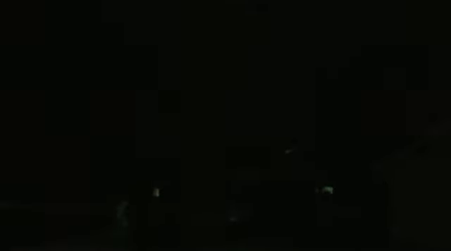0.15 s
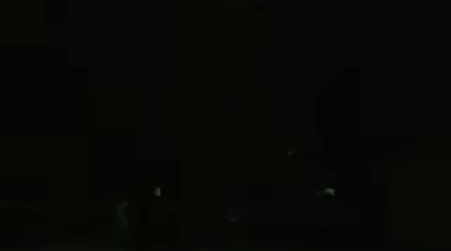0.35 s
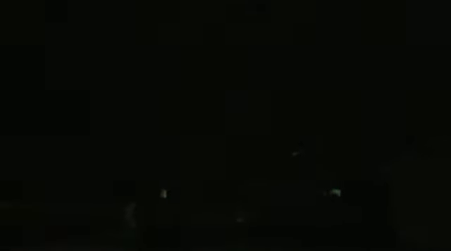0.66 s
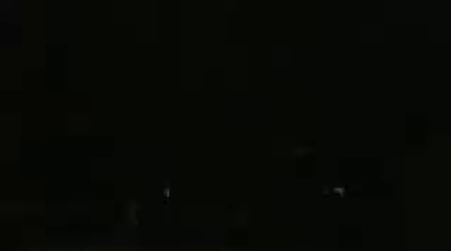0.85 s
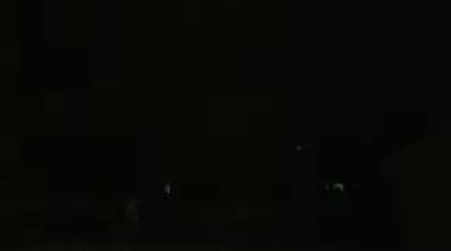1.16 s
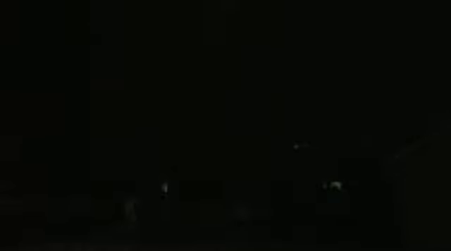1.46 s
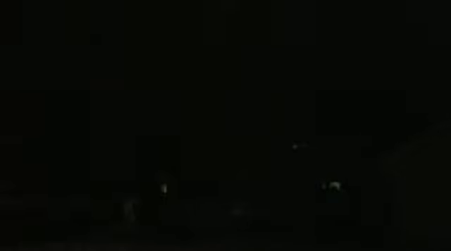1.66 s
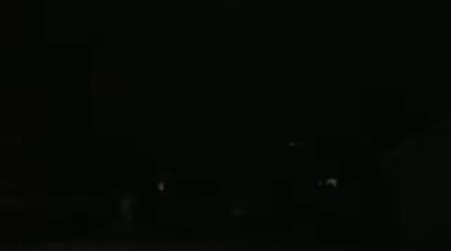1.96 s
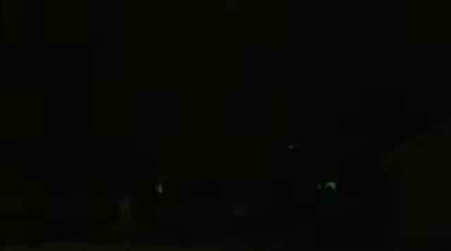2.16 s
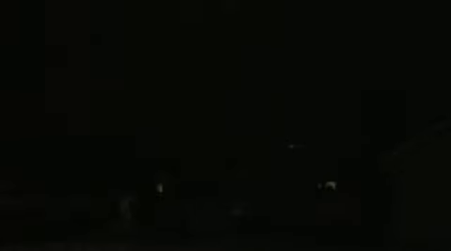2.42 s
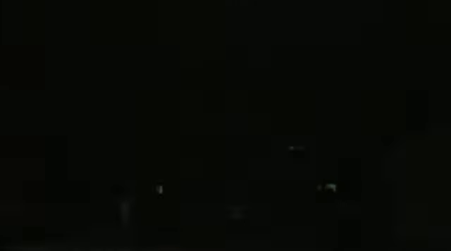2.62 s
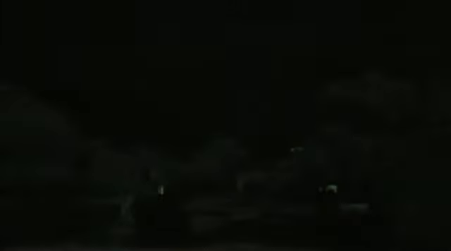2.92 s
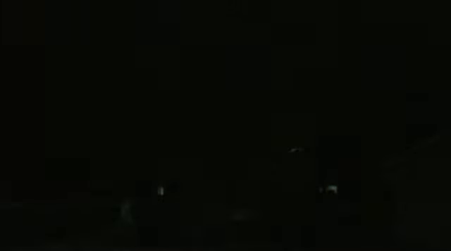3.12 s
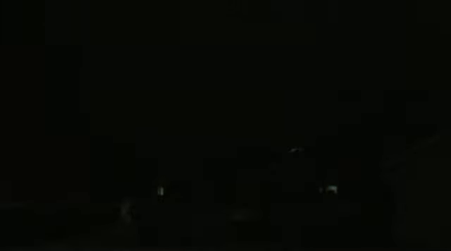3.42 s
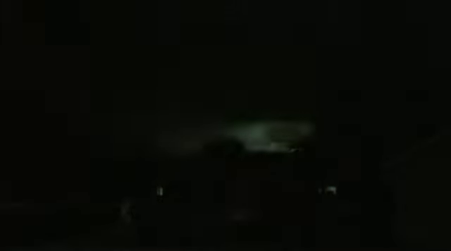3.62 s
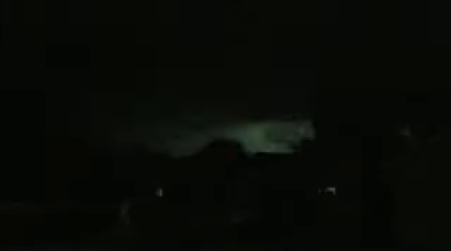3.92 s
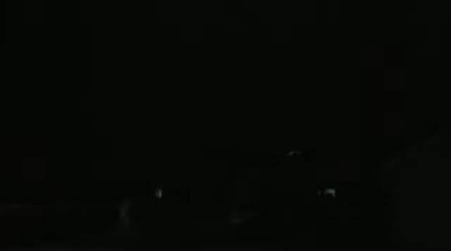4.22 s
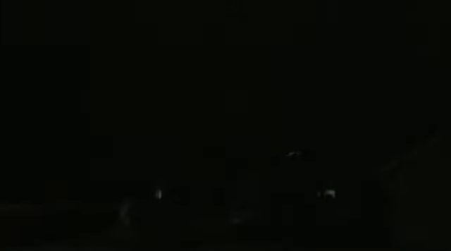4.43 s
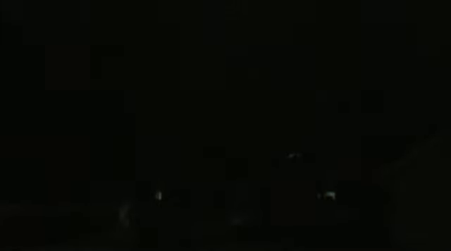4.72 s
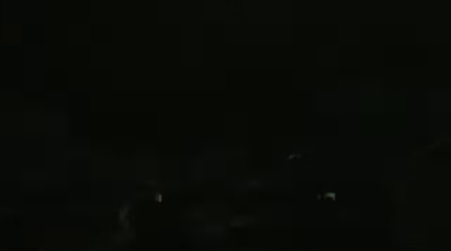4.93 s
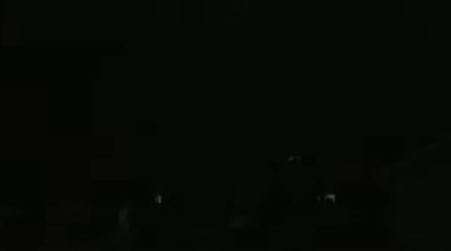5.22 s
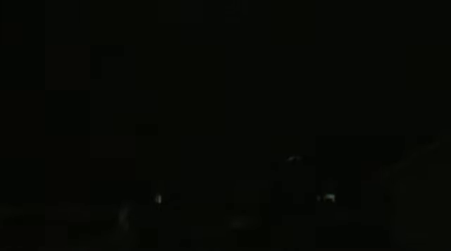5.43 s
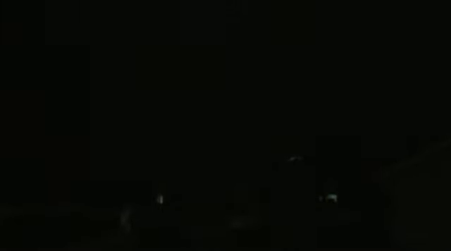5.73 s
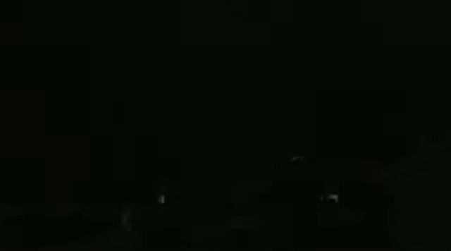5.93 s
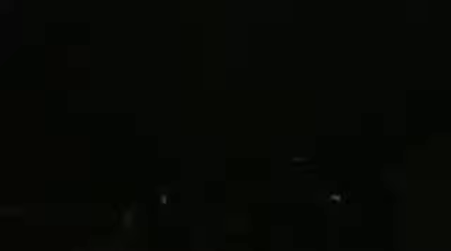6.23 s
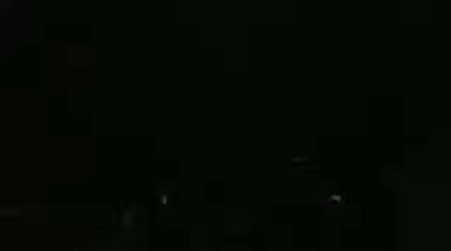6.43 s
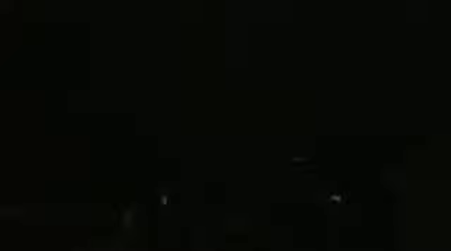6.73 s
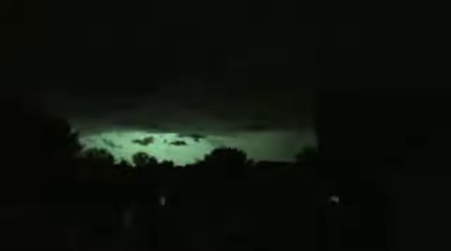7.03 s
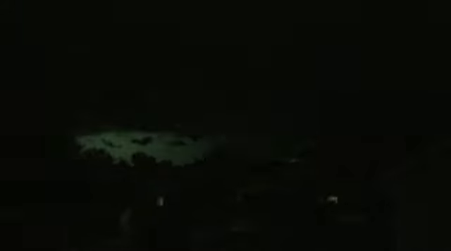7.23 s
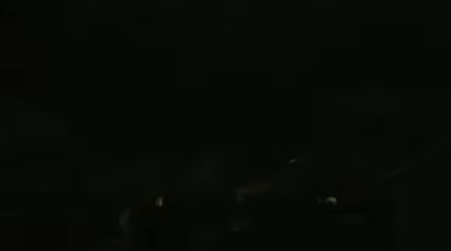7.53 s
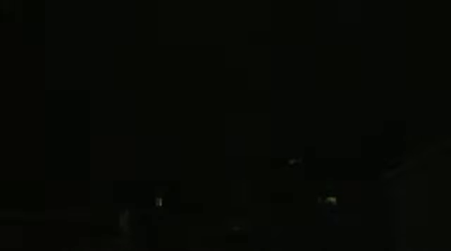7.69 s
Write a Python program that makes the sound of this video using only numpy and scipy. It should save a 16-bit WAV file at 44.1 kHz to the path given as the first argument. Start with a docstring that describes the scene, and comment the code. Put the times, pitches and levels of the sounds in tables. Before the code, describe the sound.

Night thunderstorm heard from a sheltered outdoor spot. Within half a second a hard thunderclap bursts out and tumbles into deep rumbling, which sinks to a low mutter, then a second heavy boom strikes near four seconds and rolls on in uneven swells. Steady rain hisses widely throughout, with fine patter. Close stereo microphones catch stray drops ticking on a hard ledge, a thin metal sheet and a tin can.

```python
"""Thunder rolls over steady rain, heard from a sheltered spot by a close pair of microphones.
Its rumble is made of random shocks and their noisy echoes, split into bands that swell and fade;
single shocks stand out as claps. Far rain is an even hiss of coloured noise with a fine patter.
Stray drops thud, splash and ring on a hard ledge, a thin metal sheet and a tin can nearby."""
import sys
import numpy as np
from scipy import signal
from scipy.fft import rfft, irfft, next_fast_len
from scipy.io import wavfile

SR = 44100
rng = np.random.default_rng(int(sys.argv[2]) if len(sys.argv) > 2 else 0)


def digitize_waveform(pressure):
    """Quantize a signal to 16-bit integers and store it at the path in sys.argv[1].

    Rows of a 2-D input are taken as channels; values are limited to [-1, 1].
    """
    field = np.atleast_2d(pressure).T
    bounded = np.clip(field, -1, 1)
    quanta = np.round(bounded * 32767).astype(np.int16)
    wavfile.write(sys.argv[1], SR, quanta)


N = 346626  # length of the scene in samples


def amp(db):
    """Turn decibels into a gain."""
    return 10 ** (np.asarray(db) / 20)


def rms_one(x):
    """Scale to an rms of 1."""
    return x / np.sqrt(np.mean(x ** 2) + 1e-20)


def in_time(rows):
    """Turn each column of a table of moments into a curve with one value per sample."""
    times, *columns = np.transpose(rows)
    return [np.interp(np.arange(N) / SR, times, column) for column in columns]


def at_hz(points, hz):
    """Read a table of (frequency, value) along a logarithmic frequency axis."""
    table_hz, values = np.array(points).T
    return np.interp(np.log(hz + 1), np.log(table_hz), values)


def colour(x, spectrum):
    """Filter to a given spectrum with minimum phase, so nothing sounds before its cause."""
    size = next_fast_len(N + SR // 2, real=True) // 2 * 2
    half = size // 2
    hz = np.arange(half + 1) * SR / size
    cepstrum = irfft(np.log(amp(at_hz(spectrum, hz))), size)
    cepstrum[1:half] *= 2  # fold the second half onto the first: minimum phase
    response = np.exp(rfft(cepstrum[:half + 1], size))
    return irfft(rfft(x, size) * response, size)[..., :N]


def butter(x, hz, kind, order=2):
    """Butterworth filter."""
    return signal.sosfilt(signal.butter(order, hz, kind, fs=SR, output="sos"), x)


def drift(rate_hz):
    """Slow random wander with an rms of 1: noise smoothed by two equal low-pass poles."""
    step = 40  # samples between the points of the wander
    r = np.exp(-2 * np.pi * rate_hz * step / SR)
    noise = rng.standard_normal(N // step + 2002)
    slow = signal.lfilter([1], [1, -2 * r, r * r], noise)[2000:]  # drop the filter's start-up
    return np.interp(np.arange(N) / step, np.arange(len(slow)), rms_one(slow))


def grains(per_s, spread_db):
    """Random clicks of either sign, a few much larger than the rest."""
    sizes = amp(spread_db * np.minimum(rng.exponential(1, N), 5))
    signs = rng.choice([-1, 1], N)
    return sizes * signs * (rng.random(N) < per_s / SR)


def panned(x, pan_db):
    """Mono to left and right; pan_db is left minus right."""
    return np.array([x * amp(pan_db / 2), x * amp(-pan_db / 2)])


ECHO_S = 0.017  # time for the echo power to fall to 1/e


def echoes(x):
    """The land scatters every shock into a dense smear: noise that follows the dying shock power."""
    keep = np.exp(-1 / (ECHO_S * SR))
    power = signal.lfilter([1 - keep], [1, -keep], x ** 2)
    return rng.standard_normal(N) * np.sqrt(power)


# Air resonances of the sheltered spot: (frequency [Hz], width [Hz], level [dB])
SHELTER_NOTES = [(53.7, 13, -2.5), (113.2, 8, -4.5), (162.3, 67, -10.5), (197, 15.5, -5),
                 (272.7, 15, -13.5), (368.4, 12.2, 0.5), (494, 37, -7.5)]


def shelter(x):
    """Walls and roof ring at a few low notes, which are added to the thunder."""
    out = x.copy()
    for hz, width_hz, level_db in SHELTER_NOTES:
        r = np.exp(-np.pi * width_hz / SR)
        feedback = [1, -2 * r * np.cos(2 * np.pi * hz / SR), r * r]
        note = signal.lfilter([(1 - r * r) / 2, 0, (r * r - 1) / 2], feedback, x)
        out += amp(level_db) * note
    return out


# The changing roll under the peals, as gains of its four bands:
# (time [s], rumble [dB], deep boom [dB], growl [dB], crackle [dB])
ROLL_LEVELS = [(0.0, -35, -34, -52, -60), (0.4, -33, -38, -38, -42), (0.47, -41, -23, -14.5, -35),
               (0.7, -18.5, -39, -25.5, -32), (1.1, -18.5, -46, -26.5, -33.5),
               (1.25, -27.5, -32, -33, -36.5), (1.47, -19, -39, -26, -30), (1.66, -35, -33, -36.5, -40.5),
               (2.2, -29, -42, -34.5, -41.5), (2.5, -34, -37, -40, -46), (3.42, -32, -38.5, -39.5, -44.5),
               (3.75, -27.5, -38, -29.5, -46), (3.88, -19, -21, -20.5, -45), (4.1, -22, -18, -18.5, -41.5),
               (4.35, -23.5, -22, -31, -44), (4.55, -23.5, -28.5, -26.5, -45), (4.85, -16.5, -33, -22, -47),
               (5.2, -24.5, -32, -26.5, -51), (5.6, -19, -29, -30.5, -47), (5.92, -27.5, -38, -34.5, -51),
               (6.3, -21, -37, -30, -55), (6.58, -26.5, -31, -32, -51), (7.02, -28.5, -36, -29.5, -74),
               (7.3, -22, -33, -32, -52), (7.86, -23, -31, -31, -51)]
# Colour of the thunder before it is split into bands: (frequency [Hz], relative level [dB])
THUNDER_COLOUR = [(12, -33), (20, -0.5), (43, -7.5), (82, -3), (118, 1), (285, -3), (412, -10.5),
                  (570, -13), (992, -22), (1690, -23.5), (3620, -36.5), (4350, -37), (5000, -44),
                  (6500, -88), (11000, -120)]
# Colour of the echoes from the sides, before the thunder colour: (frequency [Hz], gain [dB])
SIDE_ECHO_COLOUR = [(25, -6), (120, -12), (500, -9.5), (2000, -10.5)]
# Where the roll leans: (time [s], left minus right [dB])
ROLL_LEAN = [(0.0, 2), (1.0, 1.5), (2.2, 2), (2.7, -0.3), (3.4, -1.5), (4.1, 2.5), (5.5, 1), (6.2, 1.5),
             (7.1, 0.3), (7.86, 1)]
SHOCKS_PER_S, SHOCK_SPREAD_DB = 1800, 1.96
ECHO_DB = 0.96  # gain of the front echoes
PEAL_CRACKLE_DB = -16  # crackle of a peal relative to its growl


def roll():
    """Countless shocks and their echoes; near bends of the channel sound bright, far ones deep."""
    low, middle, high = peals()
    rumble_db, boom_db, growl_db, crackle_db = in_time(ROLL_LEVELS)
    lifts = [low, middle, high, high * amp(PEAL_CRACKLE_DB) ** 2]
    bed = amp([rumble_db, rumble_db, growl_db, crackle_db]) ** 2
    lower_gain, upper_gain, growl_gain, crackle_gain = np.sqrt(bed + lifts)  # powers add

    shocks = grains(SHOCKS_PER_S, SHOCK_SPREAD_DB)
    front = rms_one(shocks + amp(ECHO_DB) * echoes(shocks))
    sideways = colour(rms_one(echoes(shocks)), SIDE_ECHO_COLOUR)
    left, right = colour(np.array([front + sideways, front - sideways]), THUNDER_COLOUR)
    left = np.roll(left, 3)  # the wave reaches the right microphone 3 samples earlier
    both = shelter(np.array([left, right]))

    boom = panned(amp(boom_db), 3.8) * rms_one(butter(both, 62, "low", order=3))
    band = rms_one(butter(both, [75, 350], "band"))
    lower_rumble = lower_gain * butter(band, 165, "low")
    upper_rumble = upper_gain * butter(band, 221, "high")
    growl = growl_gain * rms_one(butter(both, [350, 1000], "band"))
    crackle = crackle_gain * rms_one(butter(both, 970, "high", order=3))
    mix = lower_rumble - upper_rumble - boom + growl - crackle
    return mix * panned(0.83, in_time(ROLL_LEAN)[0])


# Colour of the rain: (frequency [Hz], relative level [dB])
RAIN_COLOUR = [(300, -11), (1000, 0.5), (2000, 3), (3000, 0.5), (4200, -2.5), (6000, -1.5), (8600, -2),
               (11000, -8.5), (13000, -14), (14900, -18.5), (15500, -36), (17000, -45)]
# Loudness of the rain: (time [s], level between 4 and 11 kHz [dB])
RAIN_LOUDNESS = [(0.0, -44), (0.5, -44), (0.72, -42.5), (1.31, -42.5), (1.77, -44.5), (2.93, -45),
                 (3.41, -44), (4.71, -44), (7.86, -44.5)]
# How alike the two sides are: (frequency [Hz], likeness [1 = the same, 0 = unrelated])
RAIN_ALIKE = [(1000, 1), (3000, 0.14), (8000, 0.033), (14000, 0.085)]
PATTER_PER_S, PATTER_DB = 390, -8  # clicks each in middle and side; gain before the colouring


def rain():
    """Far drops merge into a hiss that breathes a little; nearer ones stay a fine patter."""
    breath_db = 0.5 * drift(1.4) + 0.63 * np.array([drift(17), drift(18)])
    hiss = rng.standard_normal((2, N)) * amp(breath_db)
    patter = amp(PATTER_DB) * np.array([rms_one(grains(PATTER_PER_S, 1.5)) for _ in range(2)])
    mid, side = hiss + patter

    # The more alike the two ears are, the more middle and the less side
    hz = np.geomspace(500, 16000, 11)
    alike = np.clip(at_hz(RAIN_ALIKE, hz), -0.9, 0.9)
    mid = colour(mid, np.c_[hz, 10 * np.log10(1 + alike)])
    side = colour(side, np.c_[hz, 10 * np.log10(1 - alike)])
    wide = colour(np.array([mid + side, mid - side]), RAIN_COLOUR)
    return amp(in_time(RAIN_LOUDNESS)[0]) * wide / np.std(butter(wide, [4000, 11000], "band"))


def drops(events, modes, splash_ms):
    """A drop thuds, splashes for a moment and rings the modes nearest its own brightness the most."""
    out, t = np.zeros((2, N)), np.arange(SR // 8) / SR
    for start_s, gain_db, bright_hz, focus_db, splash_db, thud_db, pan_db in events:
        rings = np.zeros((2, len(t)))
        for hz, level_db, t60 in modes:
            off_octaves = abs(np.log2(hz / bright_hz))
            level = amp(level_db - focus_db * off_octaves - 60 * t / t60)
            phase = rng.uniform(-2.92, 1.0, (2, 1))
            rings += level * np.sin(2 * np.pi * hz * t + phase)
        rings *= 1 - np.exp(-t / 0.00013)  # the drop spreads before it has handed on all its push
        rings /= np.abs(rings).max()

        noise = butter(rng.standard_normal((2, len(t))), [2000, 9000], "band", order=1)
        splash = noise * np.exp(-t * 1000 / splash_ms)
        thud = -np.sin(2 * np.pi * 900 * t) * np.exp(-t / 0.00025)
        hit = rings + amp(splash_db) * splash + amp(thud_db) * thud

        start = round(start_s * SR)
        part = out[:, start:start + len(t)]
        part += (hit * panned(amp(gain_db), pan_db)[:, None])[:, :part.shape[1]]
    return out


# Drops on the ledge: (time [s], gain [dB], brightest frequency [Hz], fall-off away from it
# [dB per octave], splash gain [dB], thud gain [dB], left minus right [dB])
LEDGE_HITS = [(0.158, -6.5, 3330, 9, -6.5, -7, -6), (0.195, -23, 2420, 30, -23, -20, -8),
              (0.2296, -22, 2410, 30, -20, -20, 1), (0.2672, -24.5, 2050, 12, -1, 14, -4),
              (0.6254, -20, 2000, 6, -18, -8, 0.1), (0.973, -12.5, 2400, 13, -2, -18, 3),
              (1.0164, -11, 3600, 18, -13, 6, -7), (1.938, -23, 1890, 10, -19, -10, -2),
              (1.9879, -25, 1990, 16, -21, -10, 0.1), (2.7477, -14.5, 2450, 41, -1, -18, -3),
              (2.9897, -23.5, 1830, 0, -21, -12, -2), (3.0579, -26.5, 1960, -12, 3.5, -10, -8),
              (3.5033, -14.5, 2550, 50, -1, -3, -1), (3.5928, -21, 2300, 20, 6, -15, -3),
              (3.7777, -27, 1970, 25, -19, -10, -12), (5.003, -13.5, 1830, 17, -4.5, 6, -0.5),
              (5.7132, -0.5, 2130, 8, -2, 3, -9), (5.927, -29, 2220, -6, 6, -10, -4),
              (5.9662, -27, 1800, 9, 11, -12, -7), (6.9825, -25, 2080, 10, -20, -10, -6),
              (7.6131, -8, 2440, 4.5, -1.5, 7.5, 3)]
# Notes of the ledge: (frequency [Hz], level before the fall-off [dB], time to fall 60 dB [s])
LEDGE_MODES = [(1980, 7, 0.014), (2180, 0, 0.025), (2870, 0, 0.015), (3285, 2, 0.018), (3890, 14.5, 0.0045),
               (6580, 7, 0.0098), (7640, 16.5, 0.0033)]


def ledge_drops():
    """Drops tick on a hard ledge, whose notes die within hundredths of a second."""
    return drops(LEDGE_HITS, LEDGE_MODES, splash_ms=0.78)


# Single shocks that stand out of the roll, before smoothing and panning:
# (time [s], peak [dB], length [ms], echo gain relative to the shock [dB])
CLAP_SHOCKS = [(0.2152, -14, 2.36, -18), (0.297, -20.5, 3.7, 7), (0.405, -14, 3, -2), (0.447, -4.5, 3, -17),
               (0.919, -10, 7.9, -13), (2.749, -20, 3.6, -1), (3.446, -16, 2.7, 3), (3.8, -5.5, 3, -19),
               (3.938, -3.5, 4.96, -5), (4.089, -22, 7.8, -1), (5.069, -2, 4.6, -19), (7.714, -34, 8.7, 0)]


def claps():
    """Each is an N-shaped pressure wave with its echoes, rounded by the long path through air."""
    shocks, scattered = np.zeros((2, N))
    for start_s, peak_db, length_ms, echo_db in CLAP_SHOCKS:
        length = max(round(length_ms * SR / 1000), 4)
        wave = -amp(peak_db) * np.linspace(1, -1, length)
        start = round(start_s * SR)
        shocks[start:][:length] += wave
        scattered[start:][:length] += amp(echo_db) * wave
    rounded = butter(shocks, 800, "low")
    smear = butter(echoes(scattered), [200, 1300], "band")
    return panned(rounded + smear, 4.5)


# Peals, each from one bend of the channel: (time of the crest [s], rumble [dB], length [s],
# growl relative to rumble [dB], depth as lower minus upper rumble [dB])
PEAL_SWELLS = [(0.521, -8, 0.048, -2, 7), (0.58, -20, .04, -4, 6), (0.612, -10.5, 0.065, -2.5, 6),
               (0.789, -13.5, 0.018, -15, -9), (0.914, -16, 0.034, -14, -1), (0.966, -13.5, .05, -5, -11),
               (1.052, -18.5, 0.02, -20, 14), (1.319, -18.5, 0.041, -7, -12),
               (1.417, -8.5, 0.034, -11.5, 0), (1.536, -27, 0.056, -22, -14),
               (1.719, -19.5, 0.024, -14, -8), (1.794, -26.5, 0.055, -1.5, 11),
               (1.885, -19, 0.056, -8.5, -6), (2.024, -26.5, .03, -18, 16), (2.142, -24.5, 0.096, -1.5, -6),
               (2.42, -30, 0.034, -16, -6), (2.63, -27, 0.047, -9, 0), (2.778, -18.5, 0.082, -7.5, 2),
               (2.985, -21, 0.069, -10.5, -2), (3.08, -30.5, 0.043, -14, -18),
               (3.281, -21.5, 0.042, -27, 1), (3.493, -20.5, .03, -0.5, -19), (3.548, -23, 0.044, -8, -10),
               (3.81, -17.5, 0.017, -5, 12), (3.966, -9, 0.042, -13, -1), (4.025, -16.5, 0.023, -6, 8),
               (4.1, -12.5, 0.057, -18, 7), (4.252, -11.5, 0.071, -9, 5), (4.362, -17, 0.06, -5, 11),
               (4.762, -9.5, 0.022, -12, -2), (4.918, -16, 0.023, -7, -17), (5.081, -14.5, 0.058, -8.5, 11),
               (5.447, -17, 0.02, -14, 1), (5.579, -23.5, 0.027, -2.5, 0), (5.705, -21.5, 0.026, -7.5, 13),
               (6.017, -26, 0.016, -20, -7), (6.12, -21.5, 0.045, -17, 3), (6.282, -14.5, 0.073, -15, 4),
               (6.386, -10, 0.044, -16.5, 10.5), (6.49, -24, 0.023, -8, 15), (6.79, -21.5, 0.045, -12, 3),
               (6.913, -19.5, 0.061, -28, -8), (7.144, -22, 0.056, -19, 11), (7.42, -18, .04, -18, 4),
               (7.546, -11, 0.02, -25, 3), (7.65, -35, 0.024, -25, 5), (7.866, -19.5, 0.077, -7, 16)]
PEAL_RISE, PEAL_FALL = 0.59, 1.01  # widths of swell and fade, in peal lengths


def peals():
    """Power of lower rumble, upper rumble and growl: each peal swells, then fades more slowly."""
    t, power = np.arange(N) / SR, np.zeros((3, N))
    for crest_s, rumble_db, length, growl_db, depth_db in PEAL_SWELLS:
        first = max(round((crest_s - 5 * length) * SR), 0)
        near = slice(first, round((crest_s + 5 * length) * SR))
        width = length * np.where(t[near] < crest_s, PEAL_RISE, PEAL_FALL)
        away = (t[near] - crest_s) / width
        levels_db = rumble_db + np.array([[depth_db / 2], [-depth_db / 2], [growl_db]])
        power[:, near] += amp(levels_db) ** 2 * np.exp(-2 * away ** 2)
    return power


# Drops on the sheet: (time [s], gain [dB], brightest frequency [Hz], fall-off away from it
# [dB per octave], splash gain [dB], thud gain [dB], left minus right [dB])
SHEET_HITS = [(0.8724, -11, 4350, 0, -14, -15, -1.1), (1.0085, -12, 4600, 1.5, -3, -18, 0.1),
              (1.191, -16, 3700, 27, -1, -20, 0.6)]
# Notes of the sheet: (frequency [Hz], level before the fall-off [dB], time to fall 60 dB [s])
SHEET_MODES = [(2010, 3.5, 0.021), (3920, 0, 0.011), (4330, -0.5, 0.02), (8600, -4, 0.018),
               (14500, -27, 0.012)]


def sheet_drops():
    """Drops tick on a thin metal sheet, with a longer splash than on the ledge."""
    return drops(SHEET_HITS, SHEET_MODES, splash_ms=3.9)


# The drop on the can: (time [s], gain [dB], brightest frequency [Hz], fall-off away from it
# [dB per octave], splash gain [dB], thud gain [dB], left minus right [dB])
CAN_HITS = [(5.779, -5.5, 4250, 3, -11, -23, 0.6)]
# Notes of the can: (frequency [Hz], level before the fall-off [dB], time to fall 60 dB [s])
CAN_MODES = [(1655, -7.5, 0.11), (2240, -8, 0.04), (2960, -9, 0.042), (3500, -11, .04), (3840, -6, .03),
             (4260, -0.5, 0.022), (5530, -3.5, 0.024), (8730, -3.5, 0.012)]


def can_drop():
    """One drop strikes a tin can, whose lowest note rings the longest."""
    return drops(CAN_HITS, CAN_MODES, splash_ms=1.6)


def scene():
    """Thunder, rain and the near drops together."""
    thunder = roll() + claps()
    near_drops = ledge_drops() + sheet_drops() + can_drop()
    return thunder + rain() + near_drops


CUTOFF_HZ = 16900  # from here up the sound is at least 70 dB down


def record(dry):
    """The input stage rounds loud peaks off towards full scale; then the top is cut."""
    rounded = np.tanh(dry)
    top_cut = signal.cheby2(12, 70, CUTOFF_HZ, fs=SR, output="sos")
    return signal.sosfilt(top_cut, rounded)


dry = scene()
out = record(dry)
digitize_waveform(out)
```